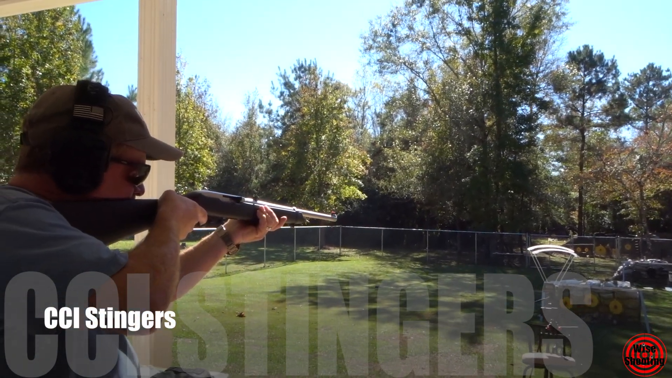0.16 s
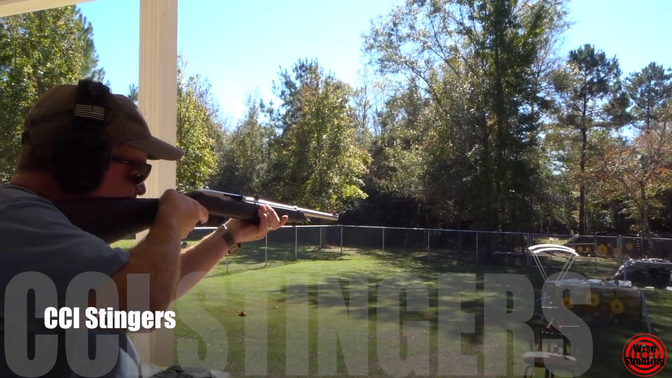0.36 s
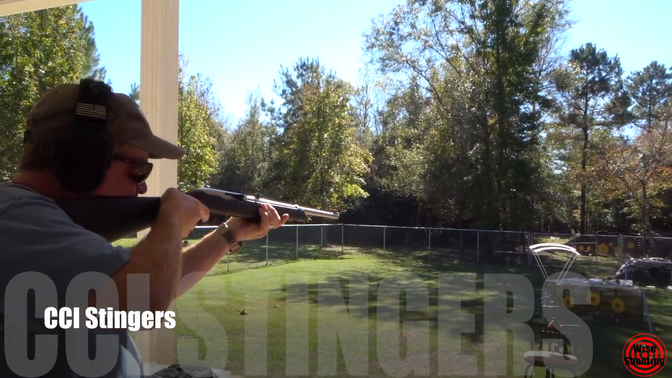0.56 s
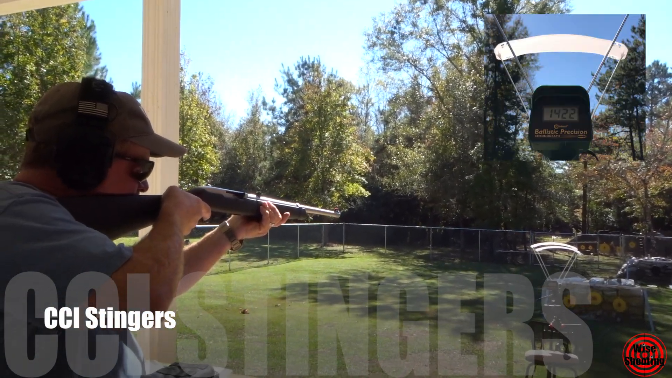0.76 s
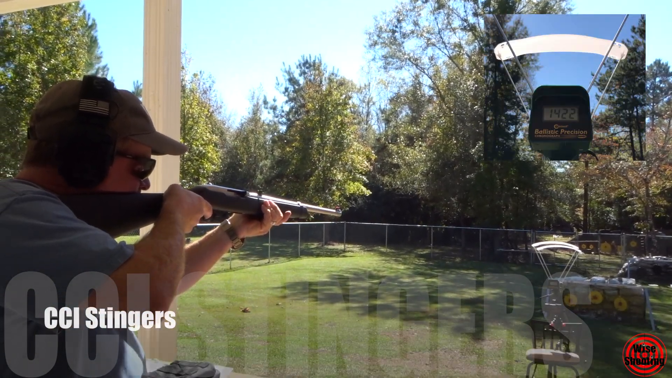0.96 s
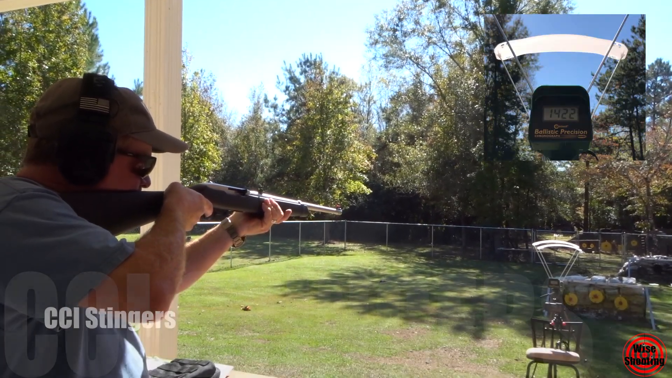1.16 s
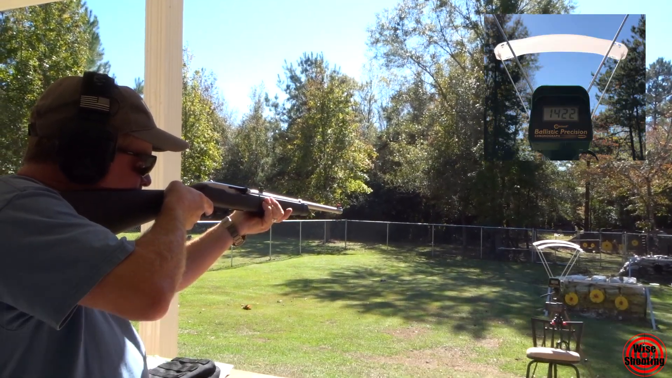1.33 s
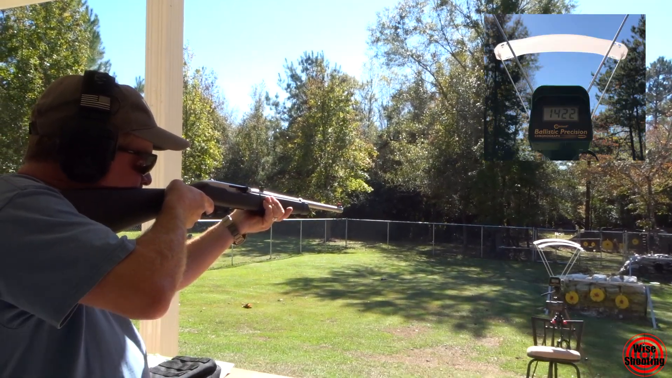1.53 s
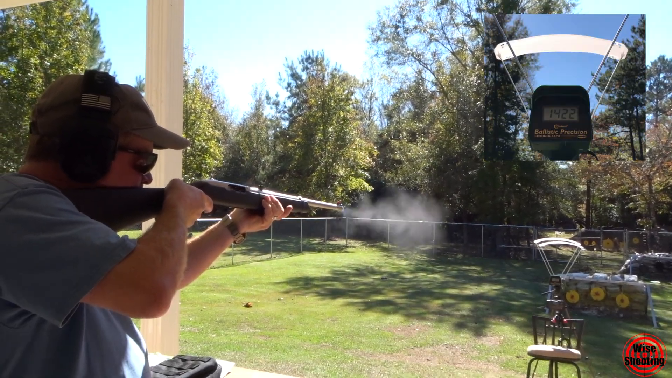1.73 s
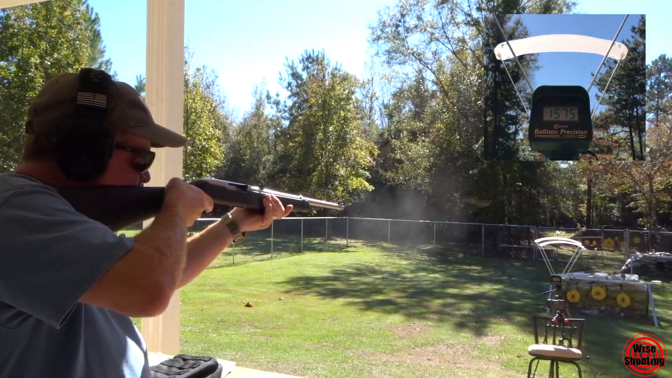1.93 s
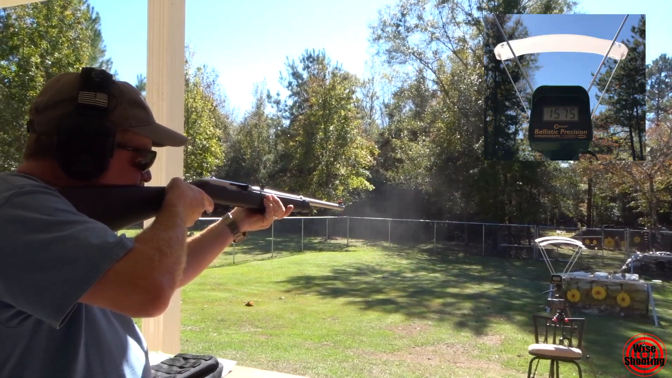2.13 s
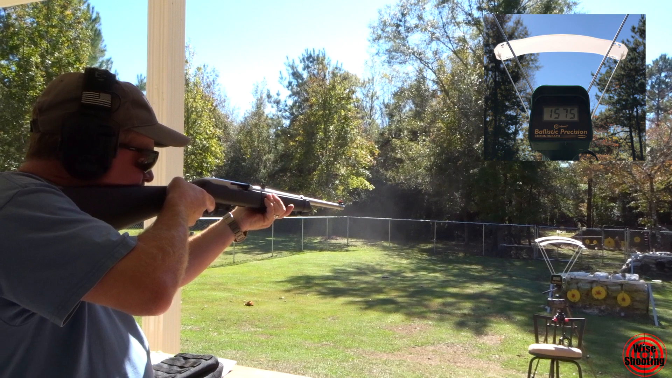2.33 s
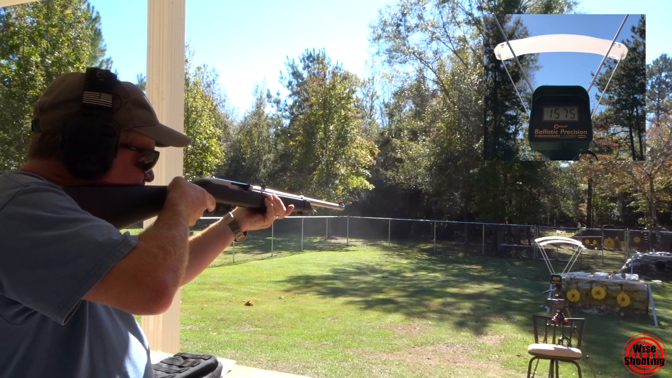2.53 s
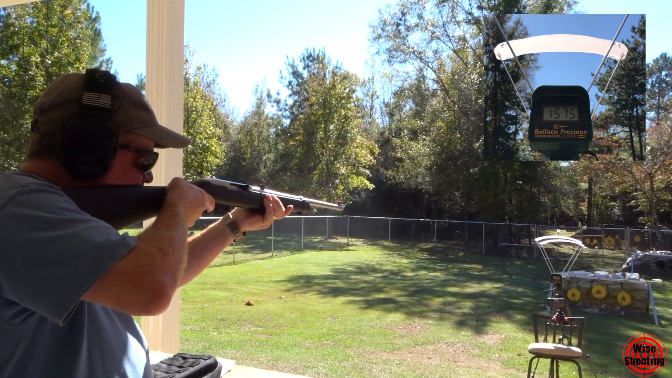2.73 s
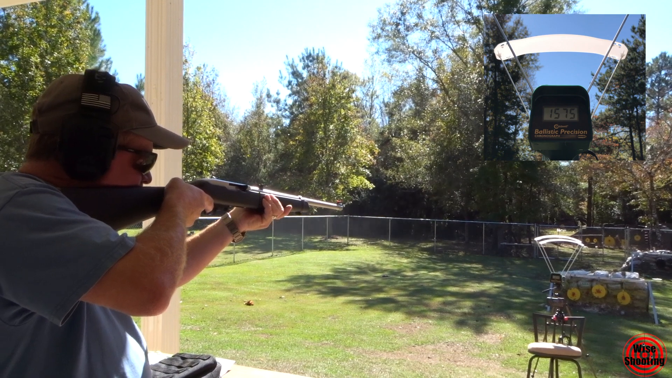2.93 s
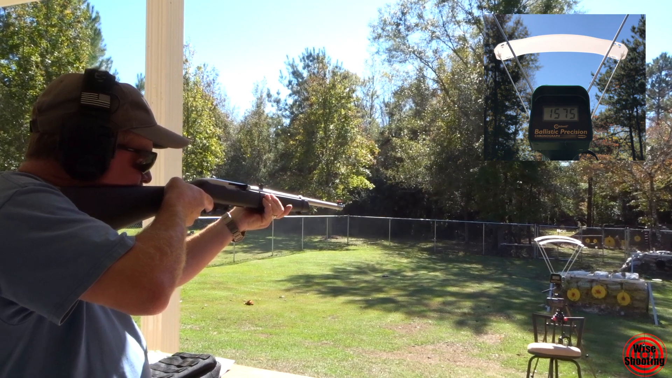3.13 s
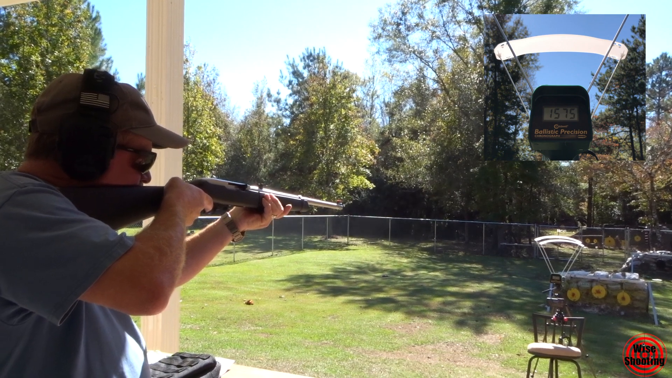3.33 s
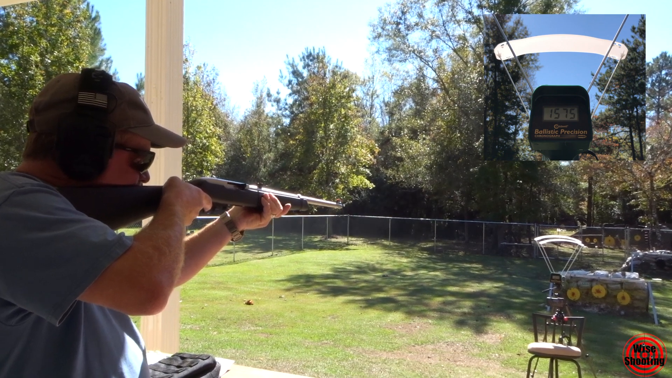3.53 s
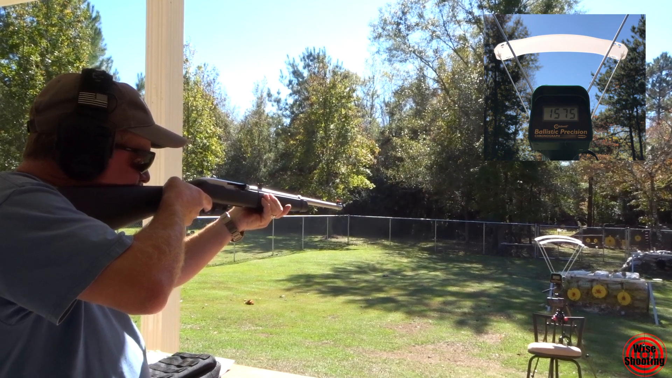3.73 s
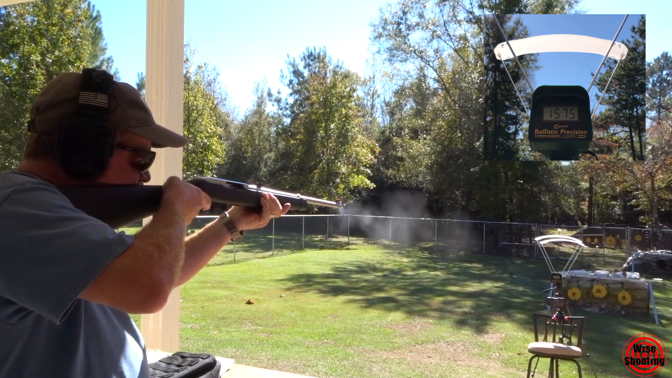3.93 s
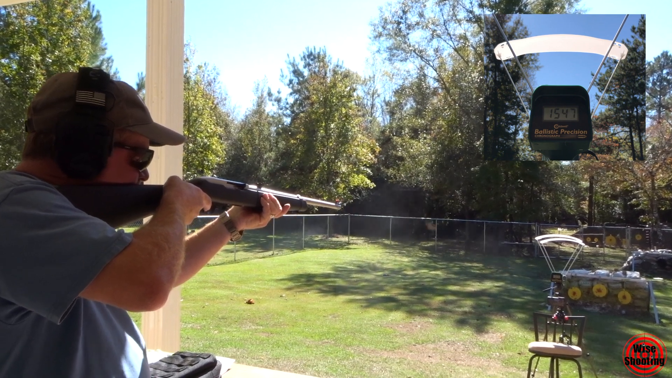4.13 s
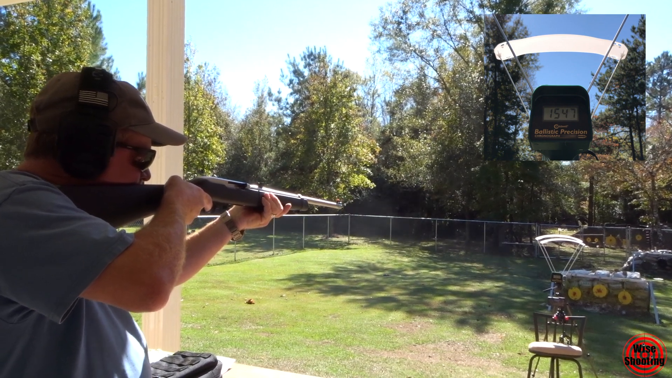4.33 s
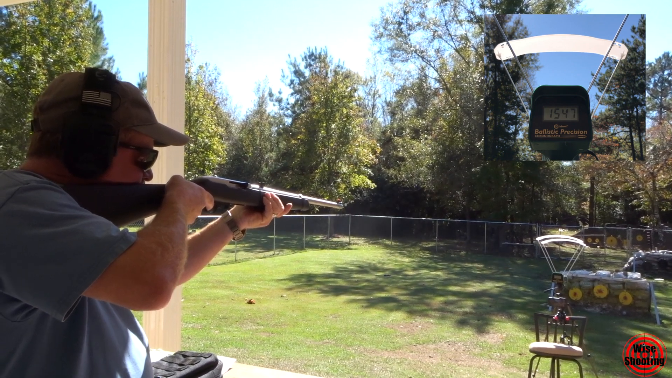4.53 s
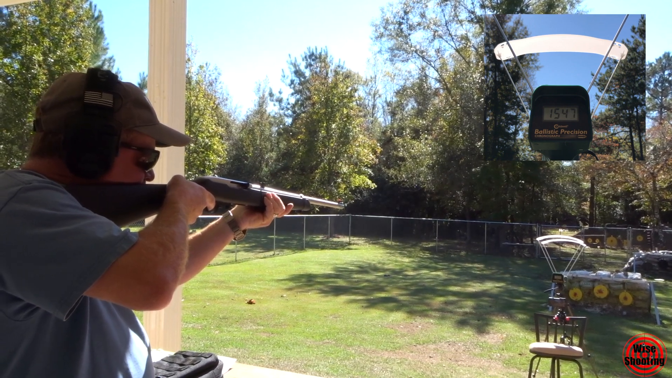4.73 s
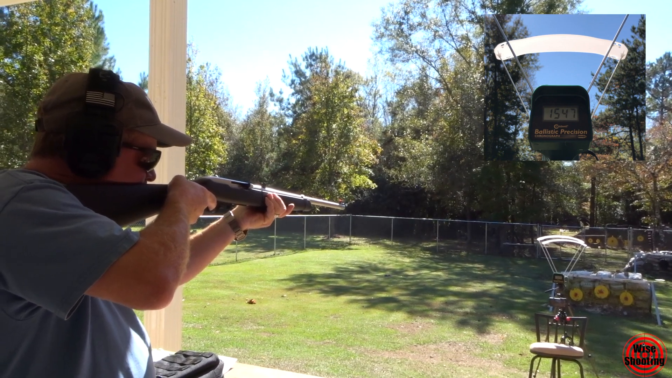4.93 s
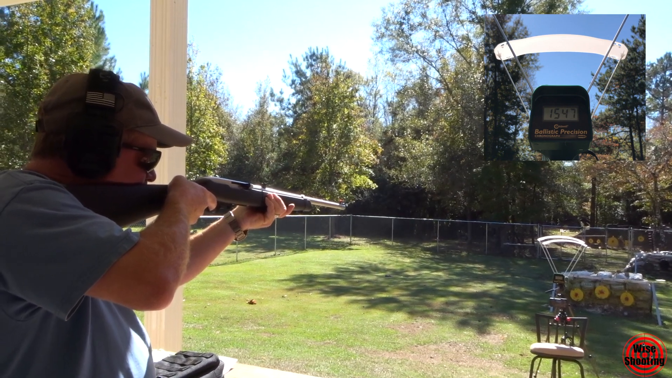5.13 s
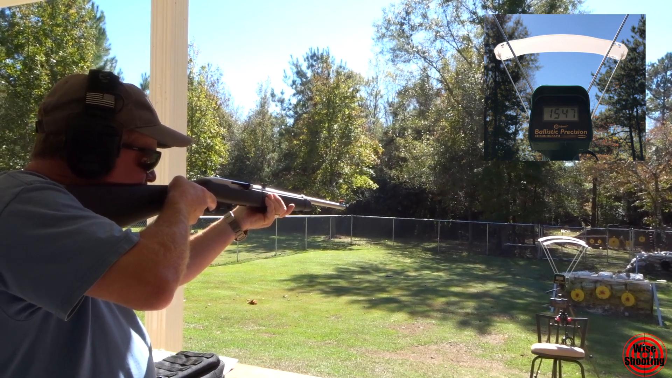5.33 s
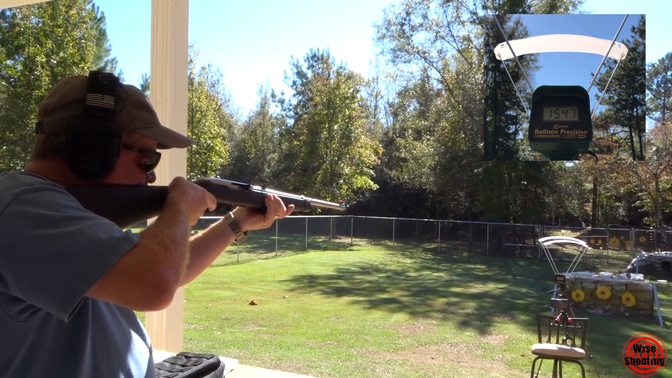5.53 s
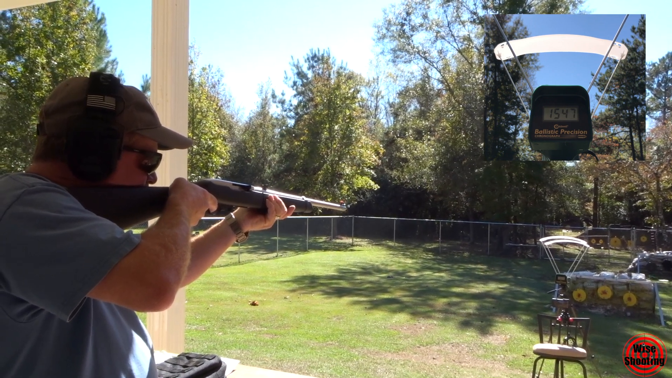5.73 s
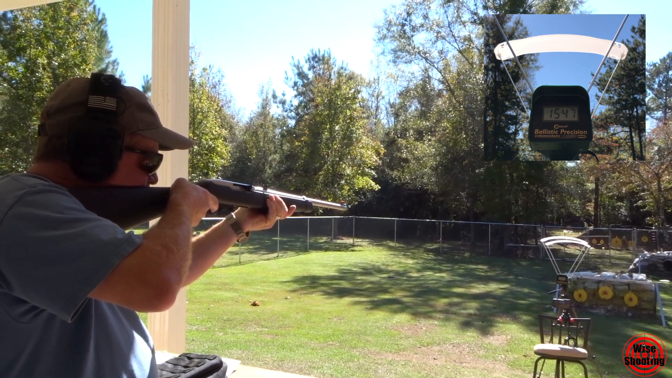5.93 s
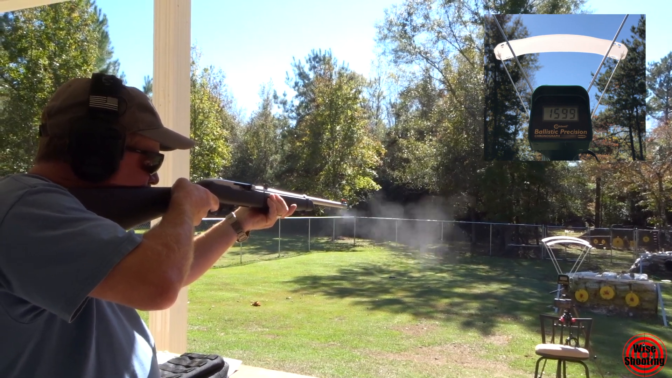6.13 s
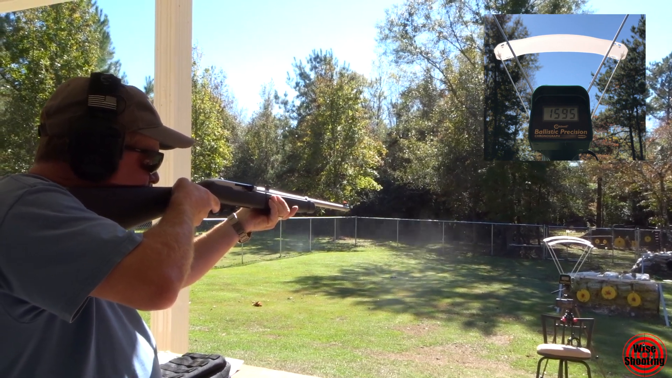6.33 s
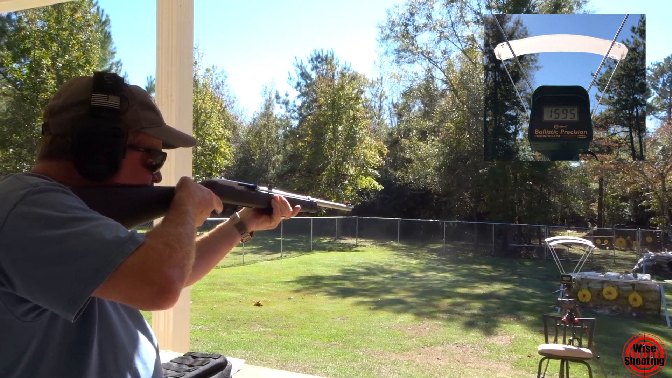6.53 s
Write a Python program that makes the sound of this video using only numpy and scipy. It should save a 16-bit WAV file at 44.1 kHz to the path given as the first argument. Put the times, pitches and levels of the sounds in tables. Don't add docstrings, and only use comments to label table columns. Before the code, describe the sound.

The opening is quiet: soft leaf rustle, with low wind rumble joining from about 0.6 s and a slight breeze near 1.2 s. At 1.72 s a small rifle cracks sharply, doubled within a tenth of a second by a distant microphone with a low membrane thump. A steel plate is struck at about 1.85 s, its thin, high, beating ring swelling then fading through scattered tree echoes. A brass case knocks on boards at 2.24 s and bounces irregularly until about 3.9 s, ending in faint hollow ticks. The second shot comes at 3.92 s, plate hit at 4.05 s, case landing at 4.41 s and skittering to around 6.05 s. The third shot at 6.10 s rings steel at 6.23 s; one casing knock at 6.61 s interrupts the remaining echo. Blasts sound compressed into plateaus, treble dying first, while background noise ducks and recovers.

```python
import sys
import numpy as np
from scipy import signal
from scipy.fft import rfft, irfft, next_fast_len
from scipy.io import wavfile
from scipy.ndimage import uniform_filter1d

SR = 44100
rng = np.random.default_rng(int(sys.argv[2]) if len(sys.argv) > 2 else 0)


def pcm_store(signal):
    levels = np.round(np.clip(np.atleast_2d(signal), -1, 1) * 32767)
    wavfile.write(sys.argv[1], SR, levels.astype(np.int16).T)


def voltage_ratio(decibels):
    exponent = np.asarray(decibels, float) / 20
    return 10 ** exponent


N = 294147

# t/s, near level/dB, far level/dB, far lag/s, darkening factor/1
BLASTS = [(1.7244, 1, 0.5, .078, 1.086), (3.9186, 0, -1, .081, 1.127), (6.0966, -1, -1, .082, 0.99)]
# t since blast/s, gain/dB
GAIN_DUCK = [(0, -21.5), (.3, -20.5), (.55, -10), (.8, -9.5), (1.2, 1.5)]
# f/Hz, near level/(dB per Hz), far level/(dB per Hz), loss/(dB/s), most loss/dB
ECHO_FIELD = [(100, -45, -3, 144.5, 57), (238.2, -23.5, 1, 151.5, 30), (405, -5.5, 0, 118, 24.5),
              (526.6, -11.5, -6.5, 10.5, -0.5), (690, -8.5, -4.5, -3.5, 1), (976, -7, -9, 0, -6.5),
              (1500, -2.5, -1.5, 4, 7.5), (2050, -1, -3.5, 9.5, 19.5), (2670, -1.5, -1, 17.5, 45),
              (4100, -8, -7, 39.5, 60), (5400, -5.5, -5, 42.5, 66.5), (6900, -8.5, -12, 49.5, 80),
              (10560, -9, -15.5, 65, 90), (15750, -23.5, -14.5, 195.5, 90)]
# f/Hz, level/dB
PORT_SIDE = [(100, -6.5), (400, -15.5), (1300, -7.5), (2400, -4.5), (4400, 2.5), (8000, 4), (12000, -1.5)]
# f/Hz, level/dB
PLATE_PARTIALS = [
    [(1163, -35.5), (2175, -41.0), (3370, -31.5), (4705, -31.5), (6185, -41.5), (6568, -40), (7784, -46.5), (8355, -37), (8543, -46), (9491, -67.5), (10277, -39.0)] + [(12274, -62), (12823, -61.5), (14373, -73), (15106, -63)],
    [(1163, -48), (2175, -36), (3365, -34.0), (3779, -47.5), (4710, -40), (4893, -31), (6562, -41), (8366, -37), (8538, -60), (10271, -50.5), (10637, -42)] + [(12823, -67.5), (15450, -58)],
    [(1163, -46), (2175, -32.5), (3365, -31.5), (4705, -29), (6185, -61.5), (6562, -36.5), (7784, -67), (8355, -39.5), (8538, -52), (9496, -67), (10255, -42.0)] + [(12263, -72), (12823, -62), (12995, -73), (14368, -61), (15111, -79)],
]
# t/s, knock level/dB, knock centre f/Hz, treble level/dB
CASE_BOUNCES = [(2.236, -15.5, 2140, -6), (2.242, -21, 2200, -11), (2.3694, -36, 1930, -14),
                (2.505, -20.5, 2530, -20), (2.816, -29, 1800, -28), (2.9194, -44.5, 1570, -21),
                (2.9894, -41, 1530, -22), (3.1194, -45, 1620, -22), (3.283, -36, 1900, -26),
                (3.3443, -42, 2370, -17.5), (3.5334, -53, 1550, -20), (3.678, -51, 5020, 3),
                (3.868, -48.5, 5220, -4.5), (4.413, -15, 2170, -24), (4.581, -22.5, 1850, -10.5),
                (4.8978, -28.5, 1960, -14), (5.0195, -38, 2330, -14), (5.1412, -40.5, 2500, -9),
                (5.532, -58, 5160, 1), (5.833, -47.5, 5170, -3.5), (5.9544, -50, 5020, -11),
                (6.0494, -60, 5050, -7), (6.6148, -16, 2430, -9)]
# f/Hz, level/(dB per Hz)
LEAF_COLOUR = [(59, -56.5), (100, -25), (674, -2.5), (837, 0), (998, -5.5), (1370, -1.5), (4360, -10),
               (7420, -12), (11000, -16.5), (14300, -42.5), (22000, -120)]
# f/Hz, level/(dB per Hz)
WIND_COLOUR = [(15, -41), (25, -8), (45, -8), (64, -5), (162, -16), (303, -22.5), (332, -28.5), (400, -21),
               (520, -52), (880, -120)]
# f/Hz, width/Hz, level/dB
BOARD_MODES = [(1506, 25, -9), (1955, 41, 0), (2330, 42, -9.5), (2680, 120, -20), (3370, 29, 0),
               (4810, 110, -11), (6090, 32, -15), (6570, 88, -15)]
# t/s, peak level/dB
FAR_TICKS = [(2.4444, -62), (2.5887, -59.5), (3.3727, -74), (3.7561, -64), (4.669, -68), (4.7194, -77),
             (4.9872, -66.5), (5.1094, -71.5), (5.6132, -55), (5.917, -60), (6.0114, -76), (6.0372, -69)]
# pin level/dB, near strike t/s, near level/dB, far strike t/s, far level/dB
STRIKES = [(-18.5, 1.852, -7.5, 1.910, -10), (-16.5, 4.053, -6, 4.1088, -3.5),
           (-24, 6.232, -6, 6.289, -5.5)]
# push t/s, push level/dB, flutter level/dB, flutter f/Hz, strike shove level/dB
PUSHES = [(1.8066, -15.5, -18.5, 345, -32), (4.0078, -12.5, -22, 334, -24.5), (6.187, -17, -15, 388, -32.5)]

T = np.arange(N) / SR
M = next_fast_len(N)
F = np.maximum(np.arange(M // 2 + 1) * SR / M, 1)

NEAR_TOP_HZ = 10870
FAR_START_S, FAR_HISS_DB = .625, -86.5
LEAVES_DB, BREEZE_S, BREEZE_SPREAD_S, BREEZE_DB = -73.5, 1.2, .22, 2.5
WIND_DB, WIND_RISE_DB, WIND_DUCK_DB, WIND_BACK_S, WIND_BACK_SPREAD_S = -64, 1.5, 14, .64, .08
PIN_LEAD_S, PIN_T60_S, NEAR_STRIKE_T60_S, FAR_STRIKE_T60_S = .0072, .012, .03, .016
NEAR_DB, NEAR_OPEN_DB, NEAR_OPEN_S, NEAR_HOLD_S, NEAR_FALL_DB, NEAR_FALL_S = -19.5, 7, .018, .4, 55, 1.7
TREELINE_S, TREELINE_SPREAD_S, TREELINE_DB = .35, .041, 3.5
FAR_DB, BURST_DB, BURST_S, WAKE_DB_PER_S, FAR_HOLD_S, FAR_DB_PER_S = -23.5, 9.5, .045, 500, .18, 23.5
RIDGE_S, RIDGE_SPREAD_S, RIDGE_DB = 1.45, .4, 6
EDGE_HZ, EDGE_DB = 500, -20.5
MASK_DB = -30.5
NEAR_TREES_S = .18
TOP_HOLD_S = .072
PUSH_HZ, PUSH_TURNS, PUSH_SAG_S, PUSH_PEAK_S = 48, .53, .0067, .0095
SHOVE_HZ, SHOVE_TURNS, SHOVE_SAG_S, SHOVE_PEAK_S = 50, 1.02, .0081, .0076
FLUTTER_LEAD_S, FLUTTER_PEAK_S = .011, .0056
RING_DB, RING_OPEN_DB, RING_OPEN_S, RING_FALL_DB, RING_FALL_S = 10.5, 19.5, .039, 89.5, 1.29
EDGE_MODE_HZ, EDGE_MODE_DB_PER_S = 4800, 38
BRASS_HZ, BRASS_WIDTH_HZ = 10380, 250
SPREAD_T60_S, SPREAD_S_PER_DB = .26, .009
RING_UNDER_DB, HOLLOW_RING_DB = -15, 12
RATTLE_PEAK_S, HOLLOW_OCTAVES = .013, .095


def curve(at, table, order=1):
    return np.interp(at, np.array(table)[:, 0], np.array(table)[:, order])


def spectrum(hz, table, order=1):
    return np.interp(np.log(hz), np.log(np.array(table)[:, 0]), np.array(table)[:, order])


def noise(gain):
    x = irfft(gain * rfft(rng.standard_normal(M)), M)[:N]
    return x / x.std()


def hump(hz, octaves):
    return np.exp(-.5 * (np.log2(F / hz) / octaves) ** 2)


def resonance(hz, width_hz):
    return 1 / (1 + (2 * (F - hz) / width_hz) ** 2)


def bump(t, at, spread):
    return np.exp(-.5 * ((t - at) / spread) ** 2)


def walk(rate_hz):
    k = int(SR / rate_hz)
    return .91 * uniform_filter1d(np.repeat(rng.standard_normal(N // k + 1), k), k)[:N]


def gate(is_open, samples):
    return uniform_filter1d(1. * is_open, size=samples)


def pair(mid, side):
    return np.array([mid + side, mid - side])


def since(lagged):
    starts = np.array([s + lagged * lag for s, _, _, lag, _ in BLASTS])
    k = np.searchsorted(starts - .012 * lagged, T) - 1
    return np.where(k < 0, 9., T - starts[k]), k


def fade(t, t60):
    return (t >= 0) * voltage_ratio(-60 * np.clip(t, 0, 9) / t60)


def background():
    t_near, t_far = since(0)[0], since(.98)[0]
    after_first = T > BLASTS[0][0]
    air = voltage_ratio(spectrum(F, LEAF_COLOUR))
    leaves_db = LEAVES_DB + BREEZE_DB * bump(T, BREEZE_S, BREEZE_SPREAD_S) + .6 * walk(9)
    leaves_db = leaves_db + 3.5 - 5 * after_first + curve(t_near, GAIN_DUCK)
    leaves = voltage_ratio(leaves_db) * pair(noise(air), .9 * noise(air * np.minimum(F / 700, 1)))
    duck_db = -WIND_DUCK_DB * (1 - np.tanh((t_far - WIND_BACK_S) / WIND_BACK_SPREAD_S)) / 2
    gusts_db = WIND_DB + WIND_RISE_DB * after_first + duck_db + 2.8 * walk(10) + 1.9 * walk(32)
    wind = voltage_ratio(gusts_db) * noise(voltage_ratio(spectrum(F, WIND_COLOUR)))
    hiss = voltage_ratio(FAR_HISS_DB + curve(t_far, GAIN_DUCK)) * noise(hump(11000, 1))
    return leaves, (wind + hiss) * (T > FAR_START_S)


def cracks():
    broad = hump(3200, 1.1)
    mid, side, mono = noise(broad), noise(broad), noise(hump(1800, 1.6))
    wake = noise(hump(12800, .05) + hump(15200, .04) + .2 * hump(13000, .39))

    def snap(t, t60):
        body = fade(t, t60) * (mono + .69 * np.sin(2 * np.pi * 1300 * t))
        return body + voltage_ratio(-24.5) * fade(t, .16) * (t < .03) * wake

    near, far = 0, 0
    for blast, (pin_db, near_s, near_db, far_s, far_db) in zip(BLASTS, STRIKES):
        near = near + voltage_ratio(pin_db - 4.5) * fade(T - blast[0] + PIN_LEAD_S, PIN_T60_S)
        near = near + voltage_ratio(near_db - 7) * fade(T - near_s, NEAR_STRIKE_T60_S)
        far = far + voltage_ratio(near_db - 16) * snap(T - near_s, NEAR_STRIKE_T60_S)
        far = far + voltage_ratio(far_db - 6.5) * snap(T - far_s, FAR_STRIKE_T60_S)
    return near * pair(mid, .7 * side), far


def near_echo_db(t):
    fall = NEAR_FALL_DB * (1 - np.exp(-np.maximum(t - NEAR_HOLD_S, 0) / NEAR_FALL_S))
    treeline = TREELINE_DB * bump(t, TREELINE_S, TREELINE_SPREAD_S)
    return NEAR_DB - NEAR_OPEN_DB * np.exp(-t / NEAR_OPEN_S) + treeline - fall


def far_echo_db(t):
    burst = BURST_DB * np.exp(-(t / BURST_S) ** 2) + WAKE_DB_PER_S * np.minimum(t, 0)
    fall = FAR_DB_PER_S * np.maximum(t - FAR_HOLD_S, 0)
    return FAR_DB + burst - fall + RIDGE_DB * bump(t, RIDGE_S, RIDGE_SPREAD_S)


def path_loss_db(hz, t, k):
    path_s = np.maximum(t - NEAR_TREES_S * (600 < hz < 5000), 0)
    rate = spectrum(hz, ECHO_FIELD, order=3)
    return np.minimum(rate * np.array(BLASTS)[k, 4] * path_s, spectrum(hz, ECHO_FIELD, order=4))


def echoes():
    (tn, kn), (tf, kf) = since(0), since(.98)
    near_db = np.where(kn < 0, -200, near_echo_db(tn) + np.array(BLASTS)[kn, 1])
    far_db = np.where(kf < 0, -200, far_echo_db(tf) + np.array(BLASTS)[kf, 2])
    fronts_db = walk(45)
    near, far = 0, voltage_ratio(far_db + EDGE_DB) * noise(hump(EDGE_HZ, .011))
    for hz in 110 * 2 ** np.arange(0, 7.3, 1 / 3):
        band = hump(hz, .14)
        width_db = 10 * np.log10(hz / 9000) + 1.6 * walk(24)
        near_rel = width_db + spectrum(hz, ECHO_FIELD) - path_loss_db(hz, tn, kn)
        far_rel = width_db + spectrum(hz, ECHO_FIELD, order=2) - path_loss_db(hz, tf, kf)
        far_rel = far_rel - .83 * hz / 1000 * (tf < 0)
        near_keep = gate((near_rel > MASK_DB) | (hz < 7500), 400)
        far_keep = gate((far_rel > MASK_DB) | (hz < 7500), 400) * ((hz < NEAR_TOP_HZ) | (tf < TOP_HOLD_S))
        ports = pair(noise(band), voltage_ratio(spectrum(hz, PORT_SIDE)) * noise(band))
        near = near + near_keep * voltage_ratio(near_db + fronts_db + near_rel) * ports
        far = far + far_keep * voltage_ratio(far_db + fronts_db + far_rel) * noise(band)
    return near, far


def rock(t, hz, turns, sag_s, peak_s):
    t = np.clip(t, 0, 1)
    swing = np.sin(2 * np.pi * (hz * t + turns * (1 - np.exp(-t / sag_s))))
    return -t / peak_s * np.exp(1 - t / peak_s) * swing


def shoves():
    out = 0
    for blast, strike, (s, push_db, flutter_db, hz, shove_db) in zip(BLASTS, STRIKES, PUSHES):
        flutter_t = T - blast[0] - blast[3] + FLUTTER_LEAD_S
        out = out + voltage_ratio(flutter_db) * rock(flutter_t, hz, 0, 1, FLUTTER_PEAK_S)
        out = out + voltage_ratio(push_db) * rock(T - s, PUSH_HZ, PUSH_TURNS, PUSH_SAG_S, PUSH_PEAK_S)
        shove_t = T - strike[3] + .0011
        out = out + voltage_ratio(shove_db) * rock(shove_t, SHOVE_HZ, SHOVE_TURNS, SHOVE_SAG_S, SHOVE_PEAK_S)
    return out


def ring_db(t):
    u = np.maximum(t, 0)
    fall = RING_FALL_DB * (1 - np.exp(-u / RING_FALL_S))
    return RING_DB - RING_OPEN_DB * np.exp(-u / RING_OPEN_S) - fall - 200 * (t < 0)


def plate():
    t, k = since(0)
    out = 0
    for shot, partials in enumerate(PLATE_PARTIALS):
        for hz, db in partials:
            in_near = hz < NEAR_TOP_HZ
            turn = 2 * np.pi * (hz * T + rng.random())
            lag = min(hz / 6000, .75) * in_near
            flicker = walk(28)
            air_db = .55 * in_near * (hz / 1000) ** 2 * (t - .3)
            hanger_db = EDGE_MODE_DB_PER_S * bump(hz, EDGE_MODE_HZ, 300) * np.maximum(t - .45, 0)
            level_db = db + 3 + ring_db(T - STRIKES[shot][1]) - air_db - hanger_db + 4.1 * flicker
            audible = (flicker > -.7) & (in_near | (t > .23) & (t < .66))
            keep = gate((hz < 9000) | audible, 500)
            out = out + (k == shot) * keep * voltage_ratio(level_db) * np.sin([turn + lag, turn - lag])
    return out


def cases():
    near = 0
    thin, bright = resonance(BRASS_HZ, BRASS_WIDTH_HZ), hump(4500, .79)
    boards = .45 + sum(voltage_ratio(db) * resonance(hz, width_hz) for hz, width_hz, db in BOARD_MODES)
    ring = pair(noise(thin), .8 * noise(thin))
    treble = pair(noise(bright), noise(bright))
    tick = noise(hump(13000, .5) + .68 * hump(5500, .4))
    rattle = voltage_ratio(3.85 * walk(70))
    for s, db, hz, treble_db in CASE_BOUNCES:
        t60 = SPREAD_T60_S + SPREAD_S_PER_DB * min(-13 - db, 34)
        brass_db = treble_db + RING_UNDER_DB + HOLLOW_RING_DB * (hz > 4000)
        knock = boards * hump(hz, .75) if hz < 4000 else hump(hz, HOLLOW_OCTAVES)
        u = np.clip(T - s + .004, 0, 9)
        shudder = u / RATTLE_PEAK_S * np.exp(1 - u / RATTLE_PEAK_S)
        shape = np.clip(u / .0025, 0, 1) * (.22 * fade(u, .04) + .2 * shudder + .33 * fade(u, t60))
        body = pair(noise(knock), .69 * noise(knock)) + voltage_ratio(treble_db) * treble
        near = near + voltage_ratio(db - 4.5) * rattle * shape * body
        near = near + voltage_ratio(db - 9 + brass_db) * np.clip(u / .008, 0, 1) * fade(u, .33) * ring
    ticks = sum(voltage_ratio(db) * (fade(T - s + .002, .02) + .25 * fade(T - s, .15)) for s, db in FAR_TICKS)
    return near, tick * ticks


def scene():
    near, far = (sum(part) for part in zip(background(), cracks(), echoes(), cases()))
    near = signal.sosfilt(signal.ellip(8, .2, 60, NEAR_TOP_HZ, fs=SR, output="sos"), near)
    return near * voltage_ratio(np.array([[.35], [-.35]])) + far + shoves() + plate()


def band_limit(x):
    return signal.sosfilt(signal.butter(12, 16330, fs=SR, output="sos"), x)


def record(dry):
    cut = np.clip(dry, -.9, .9)
    mix = signal.sosfilt(signal.ellip(8, .2, 70, 15900, fs=SR, output="sos"), cut)
    return band_limit(mix)


dry = scene()
out = record(dry)
pcm_store(out)
```